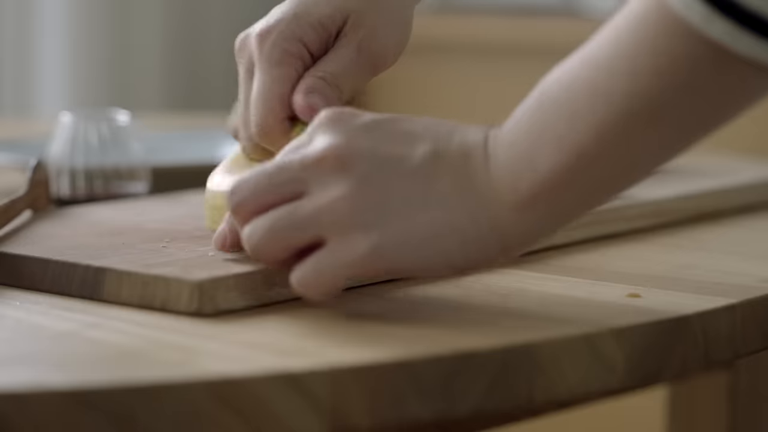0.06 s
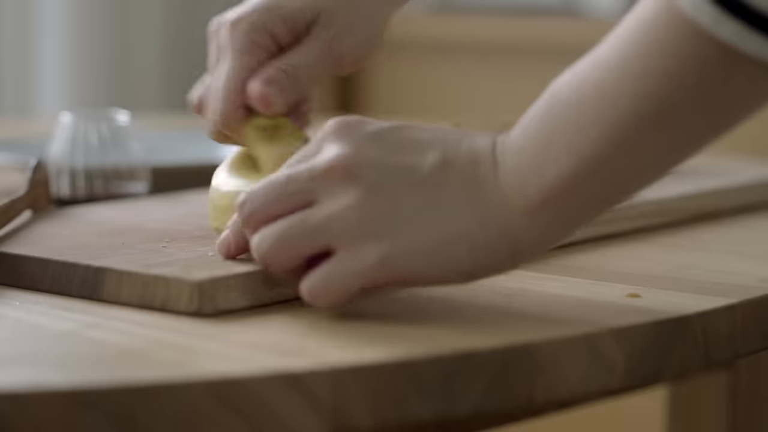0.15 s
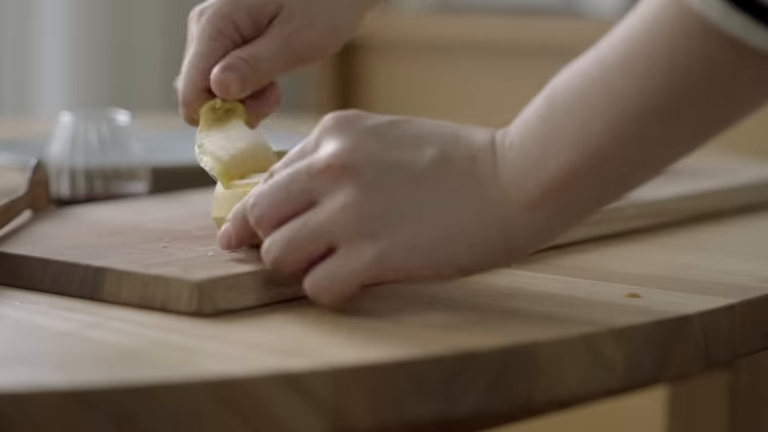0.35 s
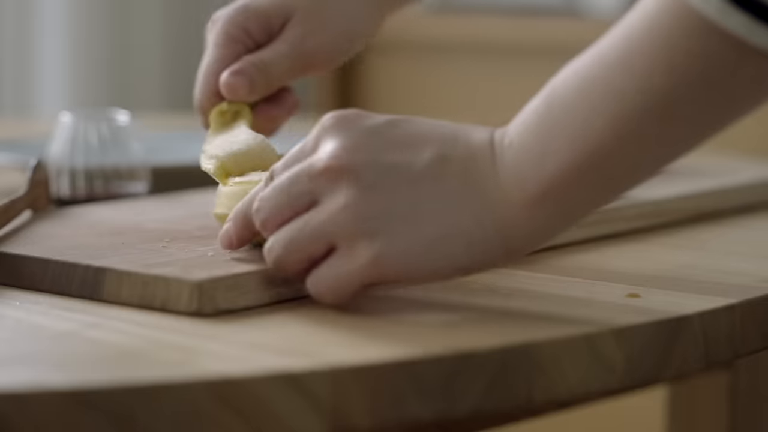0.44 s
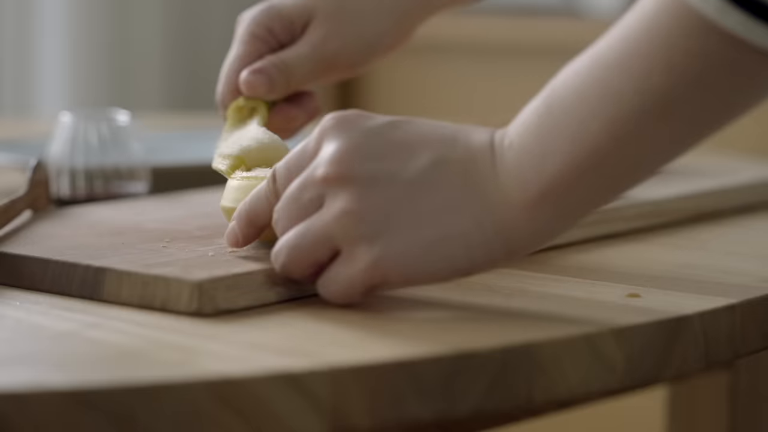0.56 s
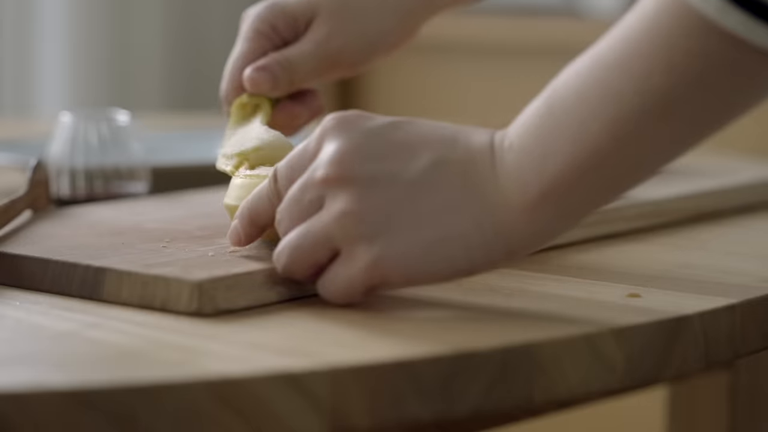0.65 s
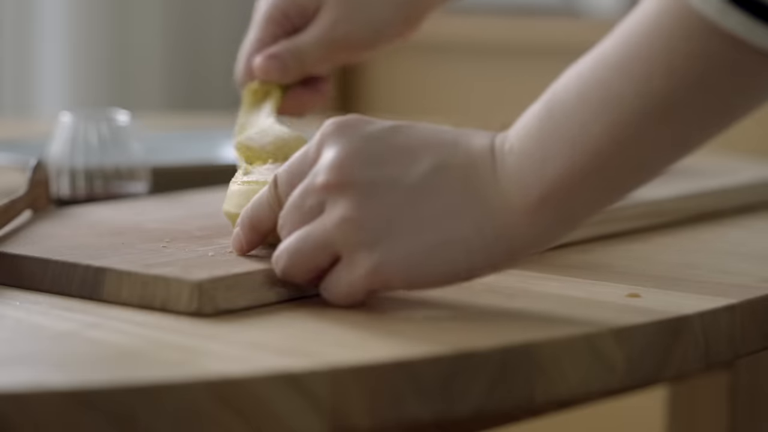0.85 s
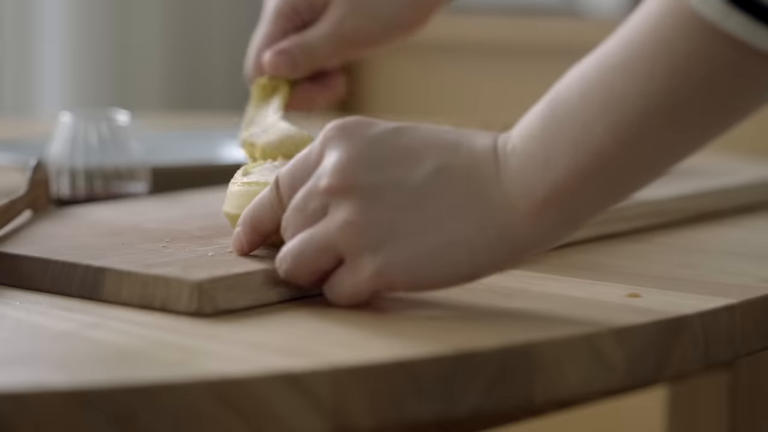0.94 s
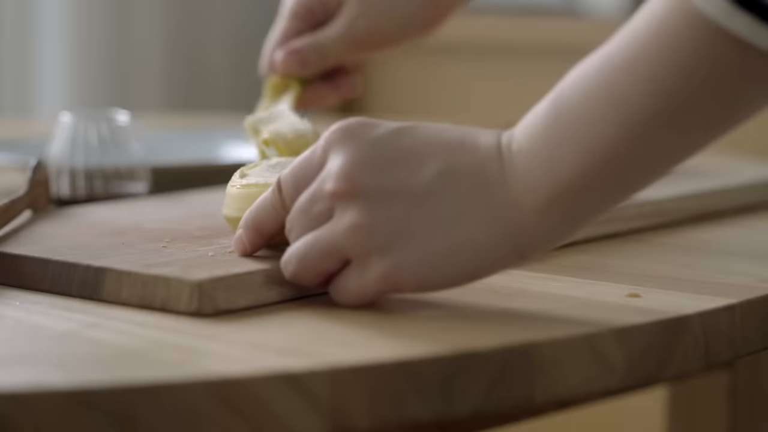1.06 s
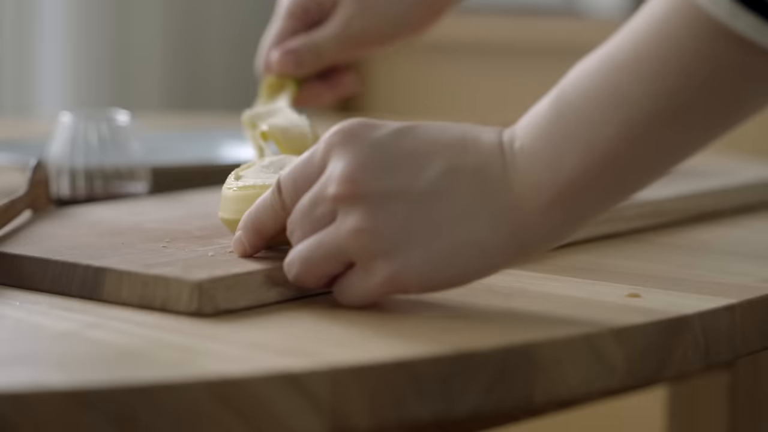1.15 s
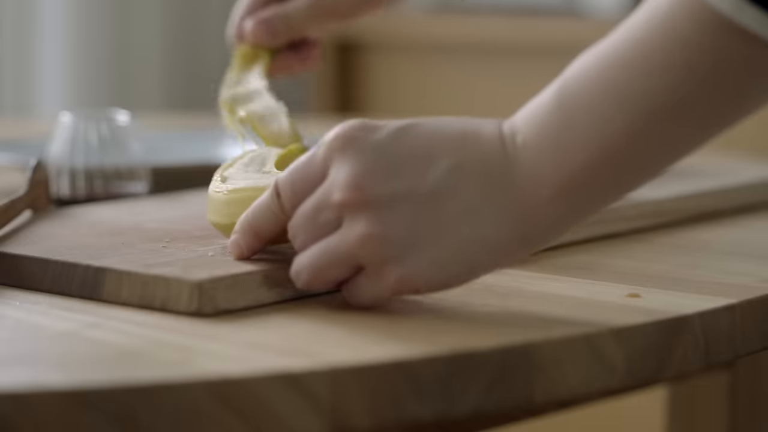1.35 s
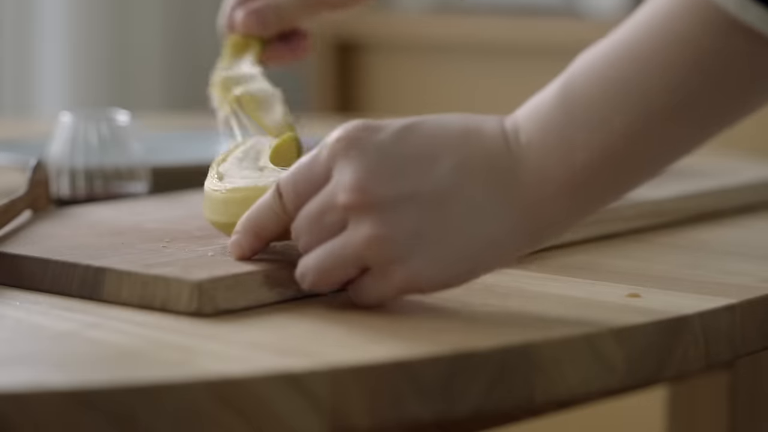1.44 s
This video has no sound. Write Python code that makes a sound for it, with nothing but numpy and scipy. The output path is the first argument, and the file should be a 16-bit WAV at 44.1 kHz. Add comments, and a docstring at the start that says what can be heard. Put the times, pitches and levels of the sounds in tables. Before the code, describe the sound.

A soft bun is torn apart by hand, close to the microphone in a quiet kitchen. After a dull bump on a wooden board, the thin crust cracks, then the moist crumb squishes and fine strands snap.

```python
"""A soft bun is pulled apart by hand on a wooden board in a quiet kitchen, close to a stereo pair.
First the hands bump the board and the fingers take hold with a faint crackle. At about a quarter second
the thin crust gives way in one quick run of ringing cracks. Then the moist crumb squishes open in
several pulls and small air pockets pop. Fine strands crackle and snap along the way, and last as the
piece is lifted, over the low murmur of the room."""
import sys
import numpy as np
from scipy import signal
from scipy.fft import rfft, irfft
from scipy.io import wavfile

SR = 44100
rng = np.random.default_rng(int(sys.argv[2]) if len(sys.argv) > 2 else 0)


def to_wav(sig):
    """Store sig (one row per channel, or 1-D mono) as 16-bit WAV at the path in sys.argv[1].

    Samples outside -1..1 are clipped; the rate is SR.
    """
    pcm = np.clip(np.atleast_2d(sig), -1, 1) * 32767
    pcm = np.round(pcm).astype(np.int16)
    wavfile.write(sys.argv[1], SR, pcm.T)  # frames by channels


N = 66150
T = np.arange(N) / SR
FFT_SIZE = 2 ** 17
HZ = np.arange(FFT_SIZE // 2 + 1) * SR / FFT_SIZE


# The crust breaking, close up. Each row: start in seconds, level in dB, decay in seconds, ring in Hz.
CRUST_CRACKS = [(.2240, -26.5, 0.0022, 4100), (.230, -24.5, .003, 3700), (0.2337, -25, 0.0023, 3880),
                (0.2392, -15.5, 0.0018, 4026), (0.2426, -18.5, 0.0043, 3840), (0.2469, -20, 0.0005, 3610),
                (0.2482, -23.5, 0.0044, 5090), (0.2542, -34, 0.0058, 5940), (0.2609, -20.5, 0.0016, 5390),
                (.266, -29, 0.0039, 5680), (.272, -26, 0.0041, 5450), (.2805, -31.5, .006, 5600)]
# The tone of its grit. Each row: frequency in Hz, relative level in dB.
GRIT_SPECTRUM = [(500, -16.5), (1100, -24), (1600, 0.5), (2400, -5.5), (4000, -1.5), (7000, 1.5),
                 (12000, 4.5), (16000, -21.5)]
# The crust as the left microphone hears it. Each row: frequency in Hz, gain in dB.
CRUST_LEFT_GAIN = [(1000, -7.5), (2500, 2.5), (4000, 1.5), (6500, 5), (9000, -5), (16000, 12)]

def crust():
    """Each crack is a dying burst of grit that rings the shell; the ring rises as the flap comes free."""
    out = 0
    for start, db, decay, hz in CRUST_CRACKS:
        grit = grains(per_s=24000, spread_db=2.2)
        ring = rms_one(resonate(grit, hz, width_hz=145))
        burst = from_db(1) * colour(grit, GRIT_SPECTRUM) + from_db(-6.5) * ring
        attack = np.clip((T - start) / .0001, 0, 1)
        out += from_db(db) * burst * attack * np.exp(-np.abs(T - start) / decay)
    return out


# Thick strands parting in front of the microphones. Each row: start in seconds, level in dB, pitch in Hz.
STRAND_SNAPS = [(.0974, -24.5, 9700), (0.128, -33, 8800), (0.1674, -23.5, 8300), (.1772, -28, 9000),
                (0.1915, -29, 9000), (0.2924, -11, 8000), (.3123, -12, 10000), (.3525, -23.5, 6150),
                (0.361, -24.5, 7200), (0.4293, -25.5, 8250), (0.4993, -18, 9400), (0.5017, -16, 7300),
                (.5212, -31.5, 7600), (0.5982, -26, 7200), (0.6019, -24, 6900), (0.7022, -34.5, 8000),
                (.7747, -26, 9000), (0.8118, -18.5, 9400), (0.8253, -16.5, 10400), (0.859, -29.5, 8800),
                (0.9364, -22, 4220), (1.086, -30.5, 6200), (1.210, -26.5, 5900), (1.2146, -31, 8760),
                (1.220, -20.5, 10200), (1.2352, -23, 10000), (1.2489, -21, 9000), (1.2547, -18, 11000),
                (1.2647, -23.5, 10000), (1.2894, -29, 10000), (1.294, -19.5, 10400), (1.314, -23, 10100),
                (1.3307, -16.5, 10100), (1.3487, -20.5, 9100), (1.3596, -32, 9000), (1.432, -40, 10100),
                (1.4707, -38, 10800)]

def snap(start, db, hz):
    """A strand breaks with a click that shares its energy with finer threads parting just after."""
    age = T[:SR // 100]
    threads = from_db(-11) * rng.standard_normal(len(age)) * np.exp(-age / .0004) * (age > 0)
    click = signal.unit_impulse(len(age))
    rings = resonate([click, click + threads], hz, width_hz=hz)
    clean, rough = highpass(rings, 0.26 * hz, order=2)
    click_rms = clean.std() / np.abs(clean).max()  # of the bare click at a peak of 1
    return place(start, from_db(db - .5) * click_rms * rms_one(rough))


# Fine strands tearing between the hands.
# Each row: start, rise, hold and fall in seconds, level in dB, low edge in Hz.
STRAND_TEARS = [(0.091, 0.0053, 0.035, 0.039, -56, 1500), (0.144, 0.034, 0.057, 0.036, -51, 2480),
                (0.223, 0.0062, 0.01, 0.11, -39.5, 2000), (0.31, 0.0089, 0.031, 0.062, -53, 2000),
                (0.703, .004, 0.062, 0.055, -59, 3000), (0.763, 0.019, 0.042, 0.053, -46, 2000),
                (0.943, 0.054, 0.041, 0.11, -76, 1500), (1.089, 0.049, 0.013, 0.16, -52.5, 4950),
                (1.19, 0.085, 0.054, 0.062, -43, 2480), (1.401, 0.12, 0.027, .03, -42, 8100)]
# The bright tone of that crackle, close up. Each row: frequency in Hz, relative level in dB.
STRAND_SPECTRUM = [(800, -29), (2200, -5.5), (3200, 0), (5000, -1.5), (8000, 6), (12000, 5.5), (16000, -3)]

def strands():
    """Fine strands crackle under each pull, thinner ones higher."""
    crackle = colour(grains(per_s=8700, spread_db=6.5), STRAND_SPECTRUM)
    return sum(swell(*shape) * rms_one(highpass(crackle, low_hz, order=2))
               for *shape, low_hz in STRAND_TEARS)


# The crumb opening just above the board.
# Each row: start, rise, hold and fall in seconds, level in dB, cavity pitch in Hz.
CRUMB_SQUISHES = [(0.123, 0.058, 0.016, 0.045, -52.5, 1560), (0.239, 0.043, 0.063, 0.2, -45.5, 1320),
                  (0.337, 0.014, 0.014, 0.084, -47, 2960), (0.409, 0.022, 0.011, 0.034, -49, 1620),
                  (0.693, 0.096, 0.075, 0.13, -51.5, 1490), (0.774, 0.017, 0.035, 0.03, -44, 1750),
                  (0.93, 0.012, 0.04, .04, -49.5, 1500), (0.937, 0.019, 0.052, 0.043, -59.5, 800),
                  (1.088, 0.019, 0.047, 0.042, -55.5, 1700), (1.22, 0.044, 0.083, 0.052, -58.5, 1530),
                  (1.452, 0.033, 0.012, .03, -52.5, 1670)]
# The wet tone of its cells. Each row: frequency in Hz, relative level in dB.
CELL_SPECTRUM = [(300, -24), (600, -3.5), (850, -5.5), (1100, 1), (1250, 10.5), (2000, -1.5), (3000, 0.5),
                 (4500, -7.5), (9000, -2.5), (16000, -10)]

def crumb():
    """Moist cells burst by the thousand and ring the opening cavity."""
    out = 0
    for *shape, hz in CRUMB_SQUISHES:
        cells = grains(per_s=7000, spread_db=2.5)
        ring = resonate(cells, hz, width_hz=420)
        cavity = rms_one(highpass(ring, 0.74 * hz, order=6))  # nothing rings far below its pitch
        out += swell(*shape) * (from_db(-3) * colour(cells, CELL_SPECTRUM) + from_db(-1.5) * cavity)
    return out


# Larger air pockets inside the bun. Each row: start in seconds, level in dB, pitch in Hz.
POCKET_POPS = [(0.0963, -50, 1420), (.2243, -34.5, 1800), (0.237, -32, 1580), (0.2465, -34.5, 1390),
               (.2848, -36.5, 1366), (0.3026, -38, 1300), (0.5012, -44.5, 1380), (0.7719, -33.5, 1600),
               (0.7855, -36, 2800), (0.7843, -29, 1660), (0.8118, -29, 1820), (0.969, -30, 1625),
               (1.486, -40, 1790)]

def pop(start, db, hz):
    """One click rings an air pocket, whose soft walls shut out frequencies far from its pitch."""
    soft_click = resonate(signal.unit_impulse(SR // 20), hz, width_hz=1300)
    ring = resonate(soft_click, hz, width_hz=294)
    return place(start, from_db(db) * ring / np.abs(ring).max())


# Hands meeting the wooden board. Each row: start, rise, hold and fall in seconds, level in dB.
BOARD_BUMPS = [(-.01, .008, 0.024, 0.063, -48), (0.066, 0.022, 0.096, .03, -58.5),
               (0.229, 0.01, 0.049, 0.03, -52), (0.852, 0.052, .02, .03, -60),
               (1.39, 0.18, 0.044, .04, -63)]
# The dull tone of the wood. Each row: frequency in Hz, relative level in dB.
BOARD_SPECTRUM = [(20, -8.5), (45, 1), (90, -6.5), (250, -9), (600, -23.5), (1500, -58)]
# Its stereo width. Each row: frequency in Hz, side gain in dB.
BOARD_WIDTH = [(30, -4), (150, -8.5), (600, -8)]

def board():
    """The hands bump the board, each time raising a brief low rumble."""
    return stereo_noise(BOARD_SPECTRUM, BOARD_WIDTH) * sum(swell(*row) for row in BOARD_BUMPS)


# Fingers on the bun, centred between the microphones.
# Each row: start, rise, hold and fall in seconds, level in dB, pitch in Hz.
FINGER_RUBS = [(0, 0.0079, 0.038, 0.065, -57, 285), (0.152, 0.024, 0.017, .04, -59, 280),
               (0.538, 0.022, 0.12, 0.031, -64.5, 397), (0.662, 0.021, 0.025, 0.024, -54.5, 133),
               (0.869, 0.017, 0.018, 0.029, -57.5, 138), (0.987, 0.039, 0.05, 0.017, -54, 178),
               (1.072, .02, 0.05, 0.027, -57, 250), (1.265, 0.008, 0.015, 0.041, -51, 194),
               (1.322, 0.016, .01, .02, -59.5, 450), (1.424, 0.014, 0.01, 0.027, -53, 280)]

def fingers():
    """Fingers knead and slide on the bread; the friction is a soft, low band of noise."""
    out = 0
    for *shape, hz in FINGER_RUBS:
        width_hz = 0.58 * hz
        friction = resonate(resonate(rng.standard_normal(N), hz, width_hz), hz, width_hz)
        out += swell(*shape) * rms_one(friction)
    return out


# Stereo width of the echoes: nearly mono through the middle, wide in the high treble.
# Each row: frequency in Hz, side gain in dB.
ECHO_STEREO_WIDTH = [(200, -24), (1000, -31), (2400, -55), (4500, -27), (8000, -8.5), (16000, -0.5)]

def echoes(db, t60_s, after_s):
    """A dying cloud of reflections, as a stereo response."""
    cloud = rng.standard_normal((2, N)) * from_db(-60 * T / t60_s) * (T > after_s)
    return from_db(db) * rms_one(widen(*cloud, ECHO_STEREO_WIDTH)) / np.sqrt(N)


def kitchen():
    """The direct path, scatter from hands and table, then the room, as a stereo spectrum."""
    near_scatter = echoes(db=-7, t60_s=.015, after_s=.0004)
    response = near_scatter + echoes(db=-13, t60_s=.3, after_s=.0034)
    response[:, 0] += 1  # the direct path
    return rfft(response, FFT_SIZE)


# The quiet kitchen all around. Each row: frequency in Hz, relative level in dB.
ROOM_SPECTRUM = [(20, -12), (60, -1.5), (150, 2), (300, -2.5), (480, -9), (800, -14), (2000, -19.5),
                 (5000, -25.5), (16000, -31.5)]
# Its stereo width. Each row: frequency in Hz, side gain in dB.
ROOM_WIDTH = [(30, 5), (80, -13.5), (250, -15), (1000, -13), (4000, -22.5), (16000, 4.5)]

def room_tone():
    """A steady low murmur of air with a faint hiss."""
    return from_db(-57) * stereo_noise(ROOM_SPECTRUM, ROOM_WIDTH)


def from_db(db):
    return 10 ** (np.asarray(db) / 20)


def rms_one(x):
    return x / np.sqrt(np.mean(x ** 2) + 1e-20)


def gains(points):
    """Rows of Hz and dB as a gain at every frequency."""
    hz, db = np.transpose(points)
    return from_db(np.interp(np.log(HZ + 1), np.log(hz), db))


def colour(x, points):
    """Shape x with a causal filter of the given spectrum; the result has rms 1."""
    cepstrum = irfft(np.log(gains(points)))
    cepstrum[1:FFT_SIZE // 2] *= 2  # folded for minimum phase: nothing sounds ahead of a click
    cepstrum[FFT_SIZE // 2 + 1:] = 0
    return rms_one(irfft(rfft(x, FFT_SIZE) * np.exp(rfft(cepstrum)))[:N])


def resonate(x, hz, width_hz):
    """One resonance: the narrower it is, the longer it rings."""
    radius = np.exp(-np.pi * width_hz / SR)
    return signal.lfilter([1, 0, -1], [1, -2 * radius * np.cos(2 * np.pi * hz / SR), radius ** 2], x)


def highpass(x, hz, order):
    return signal.sosfilt(signal.butter(order, hz, "high", fs=SR, output="sos"), x)


def grains(per_s, spread_db):
    """Tiny ruptures at random moments, a few much larger than the rest."""
    sizes = from_db(spread_db * np.minimum(rng.exponential(1, N), 4))
    return sizes * rng.choice([-1, 1], N) * (rng.random(N) < per_s / SR)


def swell(start, rise, hold, fall, db):
    """A straight rise, a hold, then 20 dB down in each fall time."""
    drop_db = 20 * np.maximum(T - start - rise - hold, 0) / fall
    return from_db(db - drop_db) * np.clip((T - start) / rise, 0, 1)


def place(start, sound):
    """A short sound at its moment."""
    out = np.zeros(N + SR)
    first = int(start * SR)
    out[first:first + len(sound)] = sound
    return out[:N]


def widen(mid, side, width):
    """Left and right from a shared part and a coloured opposed part."""
    side = irfft(rfft(side, FFT_SIZE) * gains(width))[:N]
    return np.array([mid + side, mid - side])


def stereo_noise(spectrum, width):
    """Coloured noise spread between left and right."""
    mid, side = (colour(white, spectrum) for white in rng.standard_normal((2, N)))
    return widen(mid, side, width)


def arrive(x, lag_us):
    """The spectrum at the two microphones; the sound reaches the left one slightly later."""
    lags_s = np.array([[lag_us * 1e-6], [0]])
    return rfft(x, FFT_SIZE) * np.exp(-2j * np.pi * HZ * lags_s)


def scene():
    """The bun and its echoes, over board, fingers and room tone."""
    shell = arrive(crust(), lag_us=32.6)
    shell[0] *= gains(CRUST_LEFT_GAIN)
    tearing = strands() + sum(snap(*row) for row in STRAND_SNAPS)
    squishing = crumb() + sum(pop(*row) for row in POCKET_POPS)
    bun = shell + arrive(tearing, lag_us=13.9) + arrive(squishing, lag_us=1.7)
    return irfft(bun * kitchen())[:, :N] + board() + fingers() + room_tone()


def record(dry):
    """The treble is cut steeply above 16 kHz."""
    return signal.sosfilt(signal.ellip(10, .2, 70, 16000, fs=SR, output="sos"), dry)


dry = scene()
out = record(dry)
to_wav(out)
```